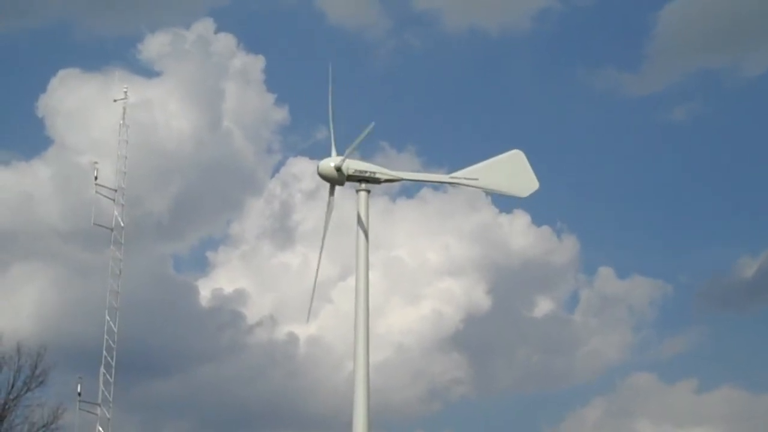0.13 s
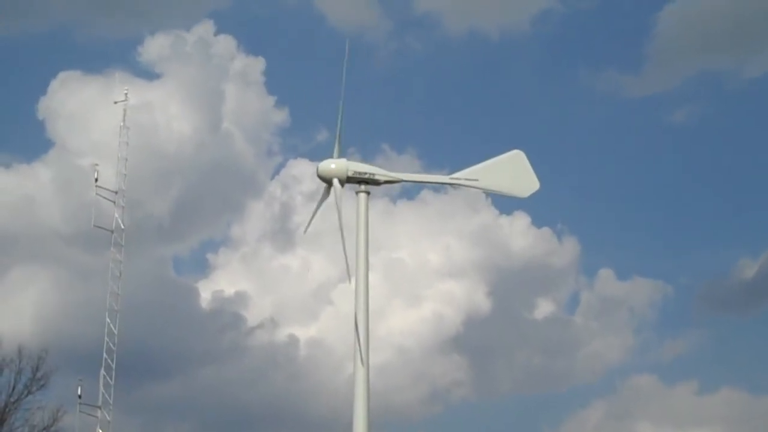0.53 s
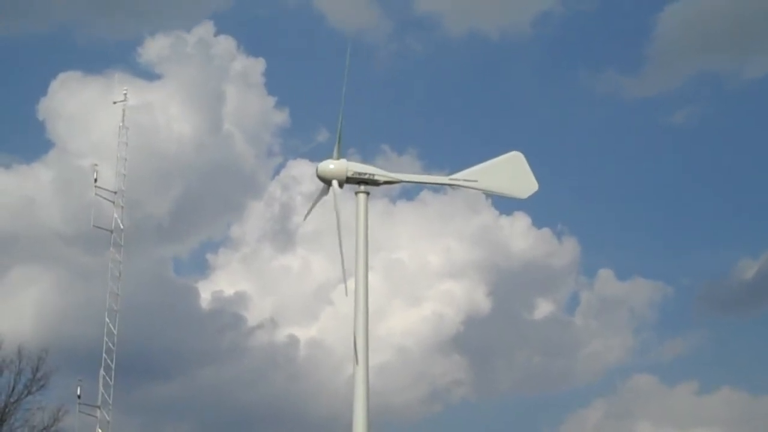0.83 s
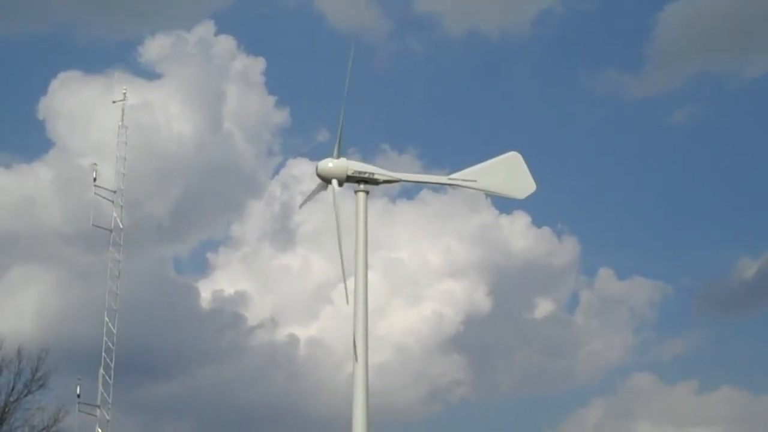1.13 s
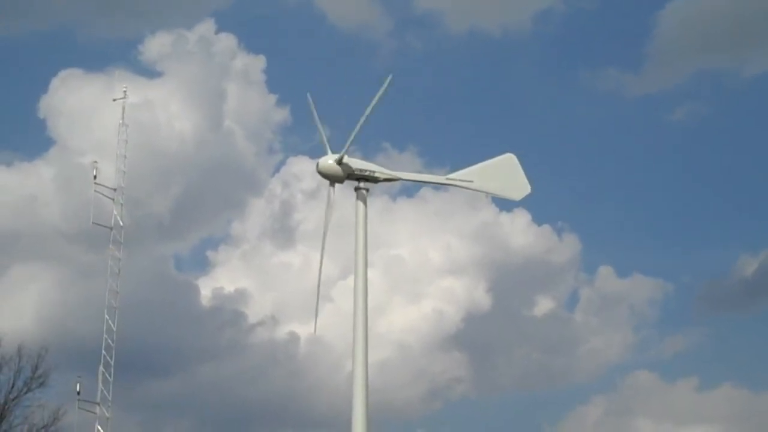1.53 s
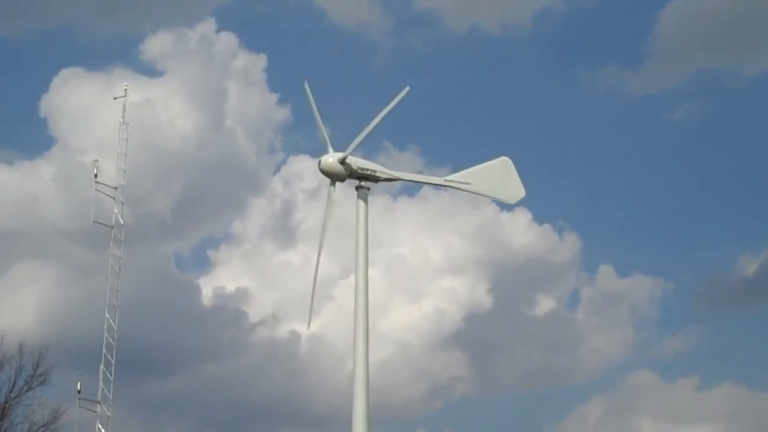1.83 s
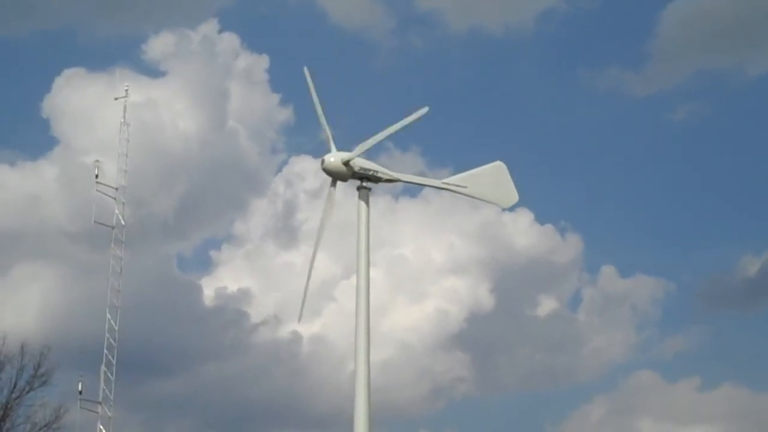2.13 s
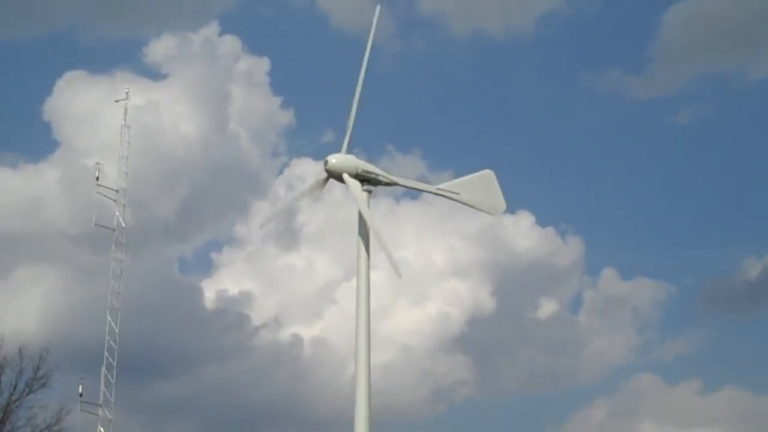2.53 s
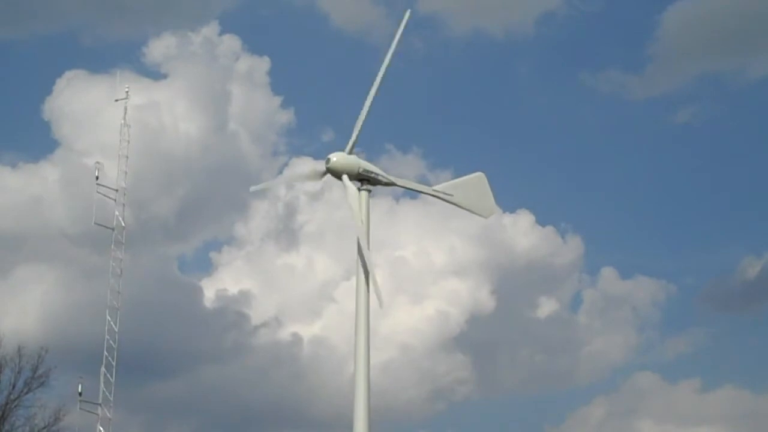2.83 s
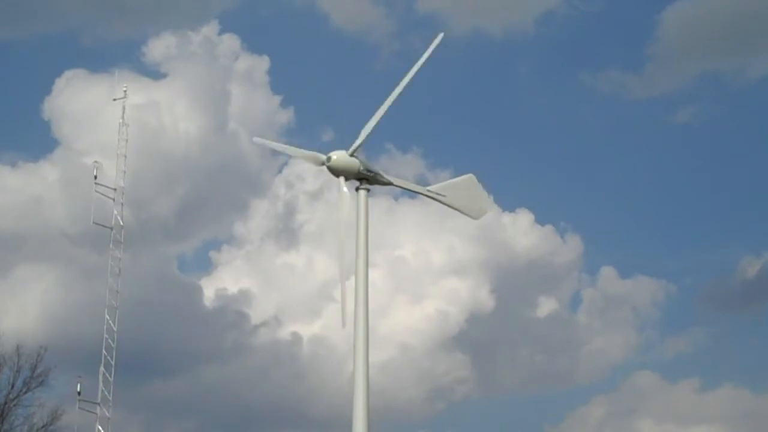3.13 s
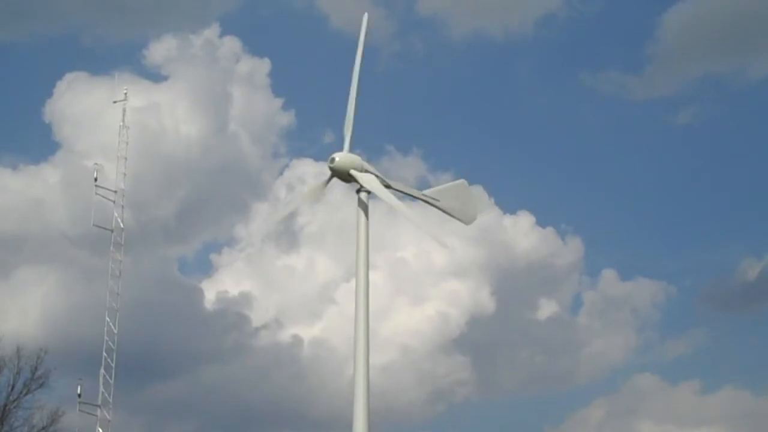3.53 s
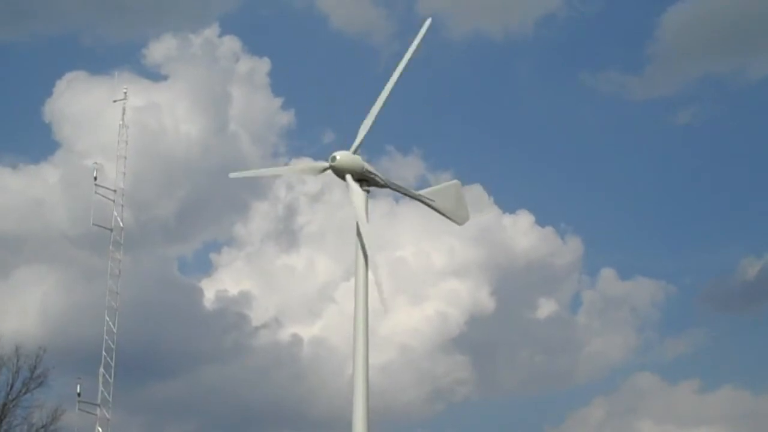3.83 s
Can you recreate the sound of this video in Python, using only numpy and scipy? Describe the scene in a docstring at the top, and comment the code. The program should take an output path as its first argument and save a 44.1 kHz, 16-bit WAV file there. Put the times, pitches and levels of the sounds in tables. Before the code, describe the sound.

Rumbling wind buffets an outdoor stereo microphone over a steady, patchy turbine hiss. Thumps hit right and left from 0.5 s, fiercest and tearing around 1.3-1.55 s, mostly left. Faint hoarse calls, perhaps crows, fill the first second; two harsh chips come near 0.9-1.0 s. A sharp overloaded bump cracks left at 1.65 s. Then gusts weaken, leaving bird whistles, brief trills around 2.3, 2.5 and 3.2 s, and scattered softer thumps.

```python
"""Gusty wind buffets the two ports of a camera microphone under a small wind turbine: lumpy low noise and eddies.
The blades and the wind make a steady rush of shaped noise, with a mid-range roar that dies away.
Birds whistle and trill as gliding tones and chip as rasping ones; hoarse far calls are narrow noise.
One sharp bump overloads the left channel, and the gain control ducks after the hardest blows."""
import sys
import numpy as np
from scipy import signal
from scipy.fft import rfft, irfft
from scipy.io import wavfile
from scipy.ndimage import uniform_filter1d

SR = 44100
rng = np.random.default_rng(int(sys.argv[2]) if len(sys.argv) > 2 else 0)


def store_wav(level_fs):
    """Save 16-bit WAV to argv[1]."""
    pcm = np.round(np.clip(np.atleast_2d(level_fs), -1, 1) * 32767)
    wavfile.write(sys.argv[1], SR, pcm.T.astype(np.int16))


N = 176400  # length in samples: 4 s

# colour of the low thump of turbulence: f/Hz, relative level per Hz/dB
THUMP_COLOUR = [(20, -84), (60, 0.5), (150, 1.5), (400, -.5), (620, -10), (1200, -37), (4000, -80)]
# colour of its brighter, tearing edge: f/Hz, relative level per Hz/dB
TEAR_COLOUR = [(200, -12), (500, 2.5), (900, 5), (1600, -7.5), (2600, -15.5), (5000, -39), (14000, -74)]
THUMP_S, TEAR_S = 0.0155, 0.012  # a burst falls to about 1/7 in this time
BIRD_LAG = 3  # samples by which the near birds reach the right port later


def amp(db):
    """Turns decibels into a plain gain."""
    return 10 ** (np.asarray(db) / 20)


def evened(x):
    """Scales a sound to an RMS (average strength) of 1."""
    return x / np.sqrt(np.mean(x ** 2) + 1e-20)


def read(points, hz):
    """Reads a curve between its points on a log-frequency axis."""
    f, value = np.transpose(points)
    return np.interp(np.log(hz + 1), np.log(f + 1), value)


def level(points):
    """Turns a level curve into a gain for each sample."""
    times, db = np.transpose(points)
    return amp(np.interp(np.arange(N) / SR, times, db))


def add(mix, s, sound, pan_db=0, lag=0):
    """Adds a sound at time s, pan_db louder on the left; the right port gets it lag samples later."""
    at = round(s * SR)
    sides = amp([[pan_db / 2], [-pan_db / 2]])
    pair = np.array([sound, np.roll(sound, lag)])[:, max(-at, 0):]
    part = mix[:, max(at, 0):]
    size = min(pair.shape[1], part.shape[1])
    part[:, :size] += sides / np.linalg.norm(sides) * pair[:, :size]


def coloured(points, size):
    """Makes noise with the given spectrum."""
    gain = amp(read(points, np.fft.rfftfreq(size, 1 / SR)))
    return evened(irfft(rfft(rng.standard_normal(size)) * gain, size))


def drift(rate_hz, size):
    """Makes smooth random motion, mostly slower than the given rate."""
    gain = 1 / (1 + (np.fft.rfftfreq(size, 1 / SR) / rate_hz) ** 4)
    return evened(irfft(rfft(rng.standard_normal(size)) * gain, size))


def phase(hz):
    """Adds up a changing pitch into the angle of a tone."""
    return 2 * np.pi * np.cumsum(hz) / SR


def fuzzy(hz, width_hz):
    """Makes a narrow band of noise that follows a pitch."""
    turn = phase(hz)
    cosine_part = drift(width_hz / 2, len(hz)) * np.cos(turn)
    sine_part = drift(width_hz / 2, len(hz)) * np.sin(turn)
    return evened(cosine_part + sine_part)


def progress(length):
    """Runs from 0 to 1 over a length of time in seconds."""
    return np.linspace(0, 1, max(round(length * SR), 2))


def burst_clock():
    """Counts a tenth of a second, with time 0 in its middle."""
    return np.arange(SR // 10) / SR - 1 / 20


def puff(colour, fall_s, crackle_db=0):
    """A burst of turbulence rises fast and dies more slowly; it may break into crackles."""
    rise_share, crackle_hz = 0.6, 600  # rise time as a share of the fall; speed of the crackles
    t = burst_clock()
    shape = np.exp(-np.maximum(t, -t / rise_share) / fall_s * 2)
    crackle = amp(crackle_db * drift(crackle_hz, len(t)))
    burst = evened(shape * crackle * coloured(colour, len(t)))
    return burst * np.sqrt(2 * np.mean(shape ** 2))


def buffeting():
    """Turbulence presses on each port separately, as low noise whose strength is lumpy."""
    # strength of the buffeting at each port: t/s, level/dB
    left_port = [(0, -20), (0.4, -27), (0.6, -19), (0.74, -19.5), (0.95, -13.5), (1.03, -19), (1.11, -11.5),
                 (1.24, -18.5), (1.56, -12.5), (1.68, -20), (1.74, -37.5), (2.4, -31), (2.64, -36.5),
                 (3.07, -30), (3.18, -46), (3.4, -32.5), (3.6, -43)]
    right_port = [(0, -27.5), (0.46, -30.5), (0.66, -24), (0.79, -35), (0.95, -14), (1.04, -29),
                  (1.13, -16.5), (1.32, -29.5), (1.55, -25), (1.7, -30.5), (1.8, -16.5), (1.88, -47),
                  (2.2, -22.5), (2.39, -16.5), (2.5, -32), (3.5, -33), (3.68, -23), (3.8, -49.5), (4, -20)]
    # colour of the buffeting: f/Hz, relative level per Hz/dB
    rumble_colour = [(12, -41), (30, -2), (55, 2.5), (120, 2.5), (220, -2), (400, -11), (800, -24.5),
                     (1600, -44), (5000, -73)]
    lump_db, lump_rate_hz = 4.5, 29.5
    ports = []
    for port in (left_port, right_port):
        lumps = amp(lump_db * np.clip(drift(lump_rate_hz, N), -2, 2))
        ports.append(level(port) * evened(coloured(rumble_colour, N) * lumps))
    return np.array(ports)


def rush():
    """Blades and air make a steady patchy hiss of noise, plus a mid-range roar that dies away."""
    # colour of the hiss: f/Hz, relative level per Hz/dB
    hiss_colour = [(59, -0.5), (100, -3.5), (302, -13), (680, -12.5), (1030, -12.5), (1270, -19.5),
                   (1530, -18), (3600, -24.5), (5820, -19.5), (6320, -23), (7630, -26), (11300, -46),
                   (13700, -43.5), (14600, -64)]
    # how alike the hiss is in the two channels: f/Hz, likeness (0 to 1)
    likeness = [(100, 0.24), (500, 1), (1200, 0.93), (3000, 0.27), (6000, 0.053), (12000, 0.12)]
    # colour of the roar: f/Hz, relative level per Hz/dB
    roar_colour = [(200, -70), (500, 11.5), (1000, 15.5), (1600, 10.5), (2300, -5), (4000, -73.5)]
    # strength of the roar: t/s, level/dB
    roar_strength = [(0, -39), (.5, -45), (.8, -42.5), (1.25, -41.5), (1.7, -48), (2.2, -62), (4, -54)]
    hiss_db, tilt_db, patch_db = -38.5, -0.24, 2.14  # the tilt is added left, taken off right

    frames, hz = N // 256 + 5, np.fft.rfftfreq(1024, 1 / SR)
    a, b, c, d, patches = rng.standard_normal((5, frames, 513))
    # smoothing over time, then over frequency, gives soft patches
    patches = uniform_filter1d(patches, size=12, axis=0)
    patches = evened(uniform_filter1d(patches, size=10, axis=1))
    same = np.clip(read(likeness, hz), -1, 1)
    left = a + 1j * b
    right = same * left + np.sqrt(1 - same ** 2) * (c + 1j * d)
    spectra = np.array([left, right]) * amp(read(hiss_colour, hz) + patch_db * patches)
    hiss = signal.istft(spectra.transpose(0, 2, 1), nperseg=1024, noverlap=768)[1]
    hiss = evened(hiss[:, :N])

    # each channel has its own roar plus a share common to both
    own_roar = np.array([coloured(roar_colour, N) for _ in range(2)])
    roar = evened(own_roar + coloured(roar_colour, N))
    return amp(hiss_db) * amp([[tilt_db], [-tilt_db]]) * hiss + level(roar_strength) * roar


def whistle(hz):
    """A nearly pure tone swells, wavers a little in pitch and strength, and fades."""
    size = len(hz)
    waver, waver_hz = 0.006, 45  # waver as a share of the pitch, and its speed
    turn = phase(hz * (1 + waver * drift(waver_hz, size)))
    swell = np.hanning(size) ** 0.35
    return evened(np.sin(turn) * swell * amp(2.1 * drift(45, size)))


def whistles():
    """Near birds give thin whistles that glide smoothly through three pitches."""
    # whistles: t/s, length/s, first f/Hz, middle f/Hz, last f/Hz, level before trim/dB, left-right/dB
    whistle_list = [(0, 0.14, 5900, 5960, 5880, -50, -19), (0.36, 0.18, 5990, 5230, 4700, -48, -10),
                    (0.59, 0.09, 4520, 4360, 4230, -51, -5), (0.73, 0.25, 4050, 3880, 3560, -52, -2),
                    (1.05, 0.05, 4000, 3850, 3500, -50, -2), (1.19, 0.16, 4500, 3670, 3370, -47.5, -2.5),
                    (1.19, 0.11, 7400, 7180, 6950, -47, 18), (1.18, 0.17, 7050, 6560, 4900, -49, 4),
                    (1.29, 0.09, 6900, 6050, 5450, -48.5, -15), (1.37, 0.17, 5330, 4850, 4500, -51, -12),
                    (1.57, 0.3, 4400, 4180, 3750, -51, -5), (1.49, 0.12, 5450, 5550, 5540, -44, -11),
                    (1.84, 0.19, 3520, 3400, 3430, -52, -1), (1.95, 0.17, 5720, 5720, 5550, -50, -9),
                    (2.14, 0.27, 5720, 4900, 4250, -44, -9), (2.11, 0.105, 2620, 2360, 2170, -44, -2),
                    (2.68, 0.39, 2270, 2580, 2680, -49, 0), (3.02, 0.06, 3780, 3550, 3680, -50, -6),
                    (3.13, 0.105, 4330, 4170, 4420, -51, -3), (3.24, 0.12, 3600, 3440, 3230, -47.5, 0),
                    (3.37, 0.13, 7200, 7150, 6780, -47.5, 12), (3.52, 0.13, 6350, 5680, 5280, -42.5, -16),
                    (3.65, 0.17, 5200, 4720, 4580, -47, -12), (3.92, 0.07, 7300, 7200, 6750, -48, 18)]
    trim_db = 1
    out = np.zeros((2, N))
    for s, length, first, middle, last, db, pan_db in whistle_list:
        curve = np.polyfit([0, 0.5, 1], [first, middle, last], 2)
        glide = np.polyval(curve, progress(length))
        add(out, s, amp(db + trim_db) * np.sqrt(2) * whistle(glide), pan_db, BIRD_LAG)
    return out


def flock(count=70):
    """Many birds farther off give faint falling whistles at random times and places."""
    flock_db, low_hz, high_hz, most_fall = -58.5, 3306, 6350, 0.08  # fall as a share of the pitch
    out = np.zeros((2, N))
    for when, long, high, fall, side in rng.random((count, 5)):
        start_hz = low_hz + (high_hz - low_hz) * high
        u = progress(0.12 + 0.25 * long)
        add(out, when * N / SR, whistle(start_hz * (1 - most_fall * fall * u)), 20 * (side - 0.5))
    return amp(flock_db) * evened(out)


def caws():
    """Hoarse far calls, perhaps crows: two blurred partials rise and fall in one arch."""
    # calls: t/s, length/s, top f/Hz, level/dB
    caw_list = [(.02, 0.3, 1760, -39), (0.33, .22, 1790, -40), (0.63, 0.2, 1810, -39),
                (0.89, 0.2, 1700, -41)]
    dip, width_hz = 0.24, 250  # the ends lie lower by this share of the top pitch
    lower_ratio, lower_db = 0.8, -3.5  # pitch and level of the lower partial beside the upper one
    out = np.zeros((2, N))
    for s, length, top_hz, db in caw_list:
        arch = abs(np.sin(np.pi * progress(length)))
        hz = top_hz * (1 - dip * (1 - arch) ** 2)
        voice = fuzzy(hz, width_hz) + amp(lower_db) * fuzzy(hz * lower_ratio, width_hz)
        add(out, s, amp(db) * np.sqrt(arch) * voice)
    return out


def eddies():
    """Single eddies hit mostly one port, each a low thump with a shorter, brighter tear at its peak."""
    # eddies: t/s, thump before trim/dB, tear before trim/dB, left-right/dB
    eddy_list = [(0.487, -11, -25, -28), (0.58, -4.5, -20, -35), (0.586, -15.5, -19.5, -26),
                 (0.659, -8.5, -12, 28), (0.937, -4, -9.5, 26), (1.084, -5, -27.5, 32),
                 (1.302, -9, -23, 10), (1.340, 0.5, -3.5, 28), (1.359, 0, -4.5, 28), (1.369, -9, -13, 24),
                 (1.381, 1, -8, 23), (1.406, 0.5, -16, 36), (1.514, -5, -18, 24), (1.543, -7.5, -22, 30),
                 (1.787, -10.5, -22, -21), (2.051, -16, -40, -25), (2.380, -13.5, -29, -15),
                 (2.715, -21, -45, -18), (3.014, -17, -25.5, -26), (3.079, -14.5, -31, 31),
                 (3.373, -19, -37, -25), (3.449, -10, -34, -26)]
    thump_trim_db, tear_trim_db, crackle_db = -3.7, -2, 4.5
    out = np.zeros((2, N))
    for s, thump_db, tear_db, pan_db in eddy_list:
        thump = amp(thump_db + thump_trim_db) * puff(THUMP_COLOUR, THUMP_S)
        tear = amp(tear_db + tear_trim_db) * puff(TEAR_COLOUR, TEAR_S, crackle_db)
        add(out, s - 1 / 20, thump + tear, pan_db)
    return out


def rasp(hz):
    """A tone rasps because its pitch is thrown about fast and unevenly."""
    swing_hz, rasp_hz = 480, 300
    return np.sin(phase(hz + swing_hz * drift(rasp_hz, len(hz))))


def chips():
    """Near birds give short harsh chips: two rasping tones that fall together."""
    # chips: t/s, length/s, f/Hz, level/dB
    chip_list = [(0.873, 0.036, 5320, -32.5), (0.984, .044, 5500, -29)]
    fall_share, upper_ratio, upper_db = 0.08, 1.42, -8  # the upper tone beside the main one
    out = np.zeros((2, N))
    for s, length, hz, db in chip_list:
        u = progress(length)
        fall = hz * (1 + fall_share * (0.5 - u))
        chip = rasp(fall) + amp(upper_db) * rasp(fall * upper_ratio)
        add(out, s, amp(db) * np.sqrt(2) * np.sin(np.pi * u) * chip, lag=BIRD_LAG)
    return out


def bump():
    """A bump on the microphone is a violent swing of pressure, mostly left, with a rattle and a low shake."""
    bump_s, swing_hz, width_s, lag_s, shake_s = 1.648, 1160, 0.0008, 0.00583, 0.019
    swing_db, snap_db, rattle_db, shake_db = -0.5, -2, -8, -3
    snap_corner_hz = 2480  # the snap dulls above this
    out, t = np.zeros((2, N)), burst_clock()
    window = np.exp(-(t / width_s) ** 2)
    swing = amp(swing_db) * np.cos(2 * np.pi * swing_hz * t) * window
    pole = np.exp(-2 * np.pi * snap_corner_hz / SR)
    grit = evened(signal.lfilter([1, 1], [1, -pole], rng.standard_normal(len(t))))
    snap = amp(snap_db) * grit * window
    rattle = amp(rattle_db) * puff(TEAR_COLOUR, TEAR_S)
    add(out, bump_s - 1 / 20, swing + snap + rattle, pan_db=44)
    # the low after-shake peaks a little later
    add(out, bump_s + lag_s - 1 / 20, amp(shake_db) * puff(THUMP_COLOUR, shake_s), pan_db=47)
    return out


def trills():
    """Near birds trill: pitch and loudness rise and fall together in a row of small arches."""
    # trills: t/s, length/s, first top f/Hz, last top f/Hz, arches per second/Hz, starting depth/Hz,
    # swell from start to end/dB, level/dB
    trill_list = [(2.289, 0.08, 2150, 2950, 37, 650, 4, -42.5),
                  (2.509, 0.12, 2900, 2250, 25, 800, -11, -44),
                  (3.222, 0.19, 5450, 4150, 57.5, 1000, -9, -41)]
    narrowing = 0.496  # share of its depth that a trill loses by its end
    settle = 1.9  # how early in a trill its pitch settles (1 = an even slide)
    out = np.zeros((2, N))
    for s, length, first, last, rate, depth, swell_db, db in trill_list:
        u = progress(length)
        arch = abs(np.sin(np.pi * rate * length * u))
        top = last + (first - last) * (1 - u) ** settle
        hz = top - depth * (1 - narrowing * u) * (1 - arch)
        fade = np.minimum(1, 10 * np.minimum(u, 1 - u))
        loudness = amp(db + swell_db * (u - 0.5)) * 2 * arch * fade
        add(out, s, loudness * np.sin(phase(hz)), lag=BIRD_LAG)
    return out


def outdoors(x):
    """Trees and ground scatter the sound into a thin noisy tail that dies away."""
    echo_db, t60_s = -14, 0.45  # the tail falls 60 dB in t60_s
    t = np.arange(SR // 2) / SR
    tail = rng.standard_normal((2, len(t))) * amp(-60 * t / t60_s)
    tail = tail / np.linalg.norm(tail[0])
    echo = signal.fftconvolve(x.mean(0)[None], tail, axes=1)[:, :N]
    return x + amp(echo_db) * echo


def scene():
    """Wind on the microphone sounds over the turbine's rush and the calls, which alone get the scatter."""
    wind = buffeting() + rush() + eddies() + bump()
    calls = whistles() + flock() + caws() + chips() + trills()
    return wind + outdoors(calls)


def record(dry):
    """Gain control ducks both channels after hard blows; overload clips; then the top is cut off."""
    limit_db, grip_s, recover_db_per_s = -10.5, 0.017, 95
    squeeze = 0.47  # dB of ducking for each dB held over the limit
    edge_hz = 16295
    over_db = np.maximum(20 * np.log10(abs(dry).max(0) + 1e-9) - limit_db, 0)
    # hold each peak and let it sink at a steady rate
    fall = np.arange(N) * recover_db_per_s / SR
    held_db = np.maximum.accumulate(over_db + fall) - fall
    # the gain takes a moment to follow, so a sharp blow gets through first
    r = np.exp(-1 / (grip_s * SR))
    duck_db = squeeze * signal.lfilter([1 - r], [1, -r], held_db)
    clipped = np.clip(dry * amp(-duck_db), -1, 1)
    low_pass = signal.firwin(511, edge_hz, window=("kaiser", 9), fs=SR)
    return signal.oaconvolve(clipped, low_pass[None], "same")


dry = scene()
out = record(dry)
store_wav(out)
```